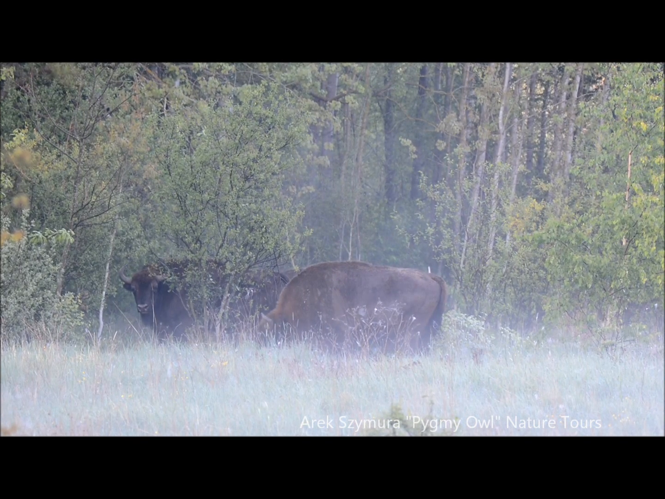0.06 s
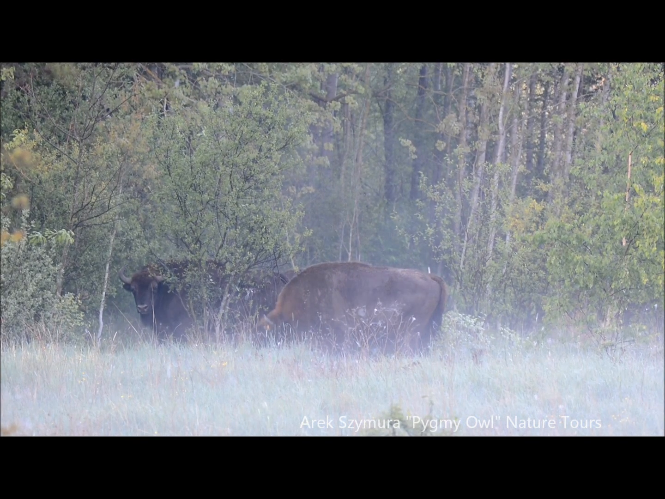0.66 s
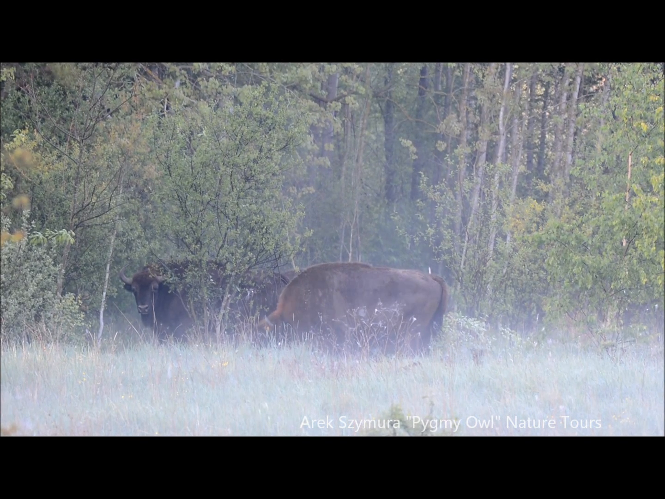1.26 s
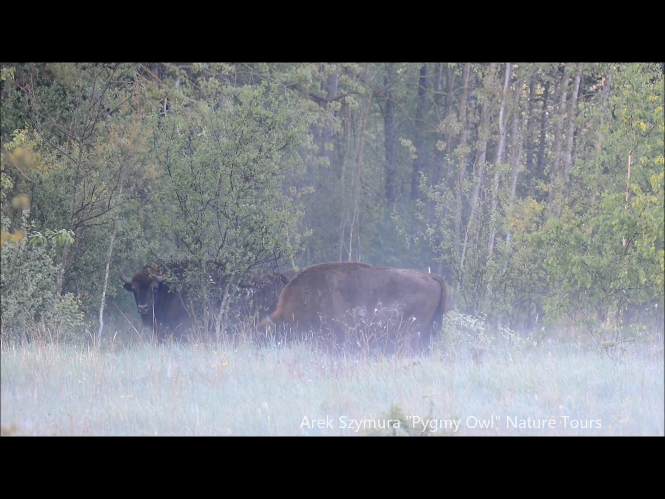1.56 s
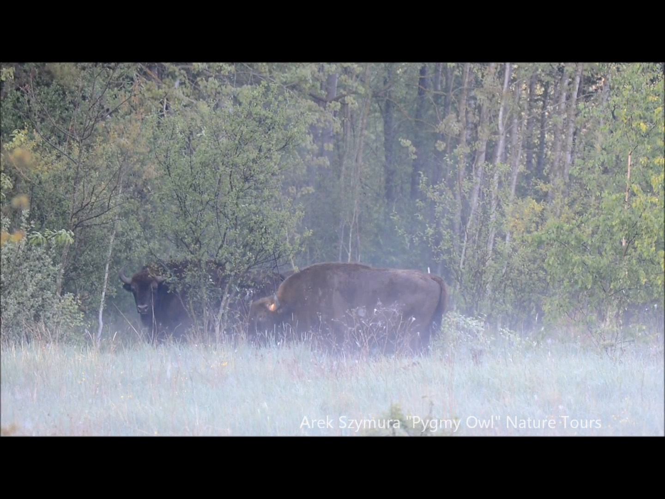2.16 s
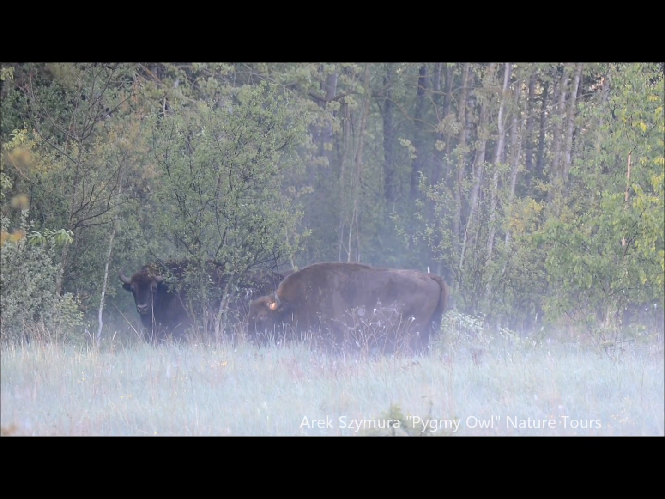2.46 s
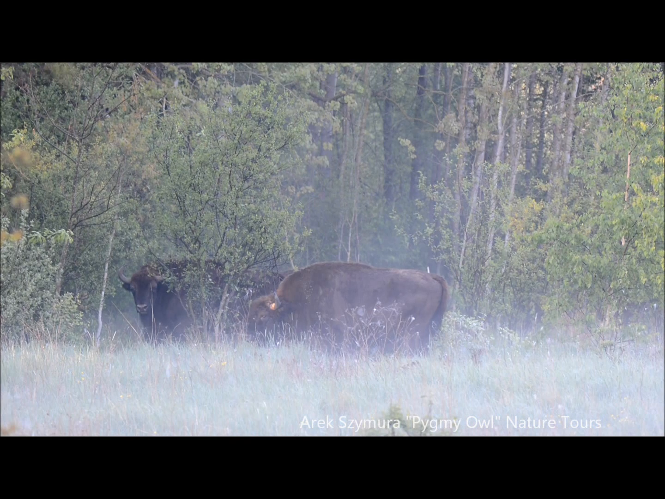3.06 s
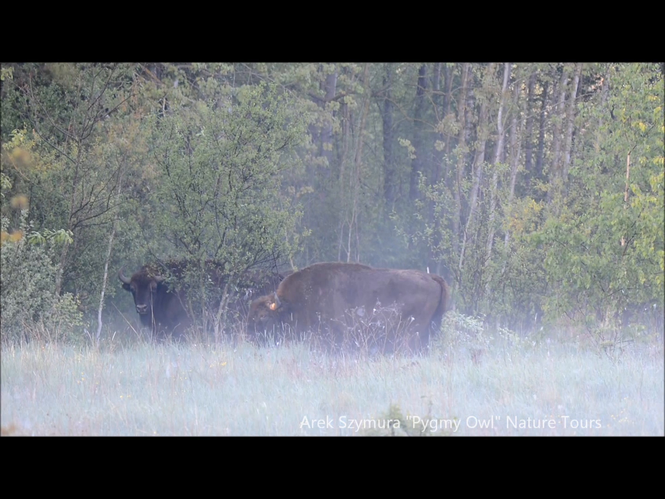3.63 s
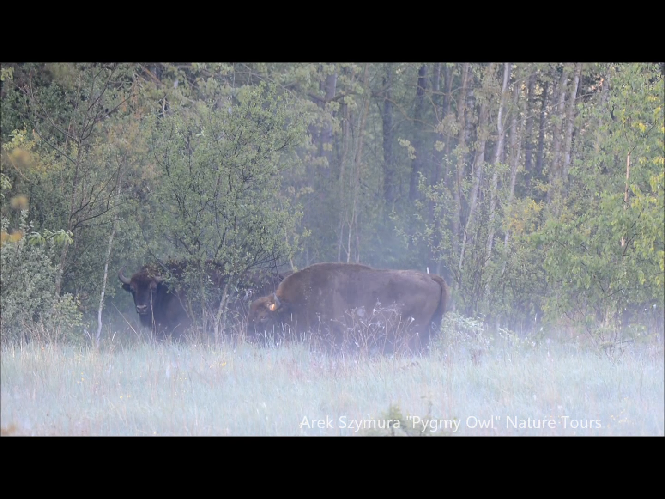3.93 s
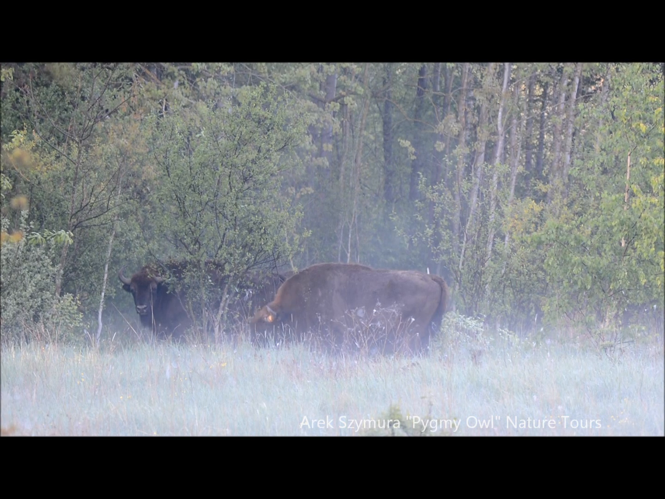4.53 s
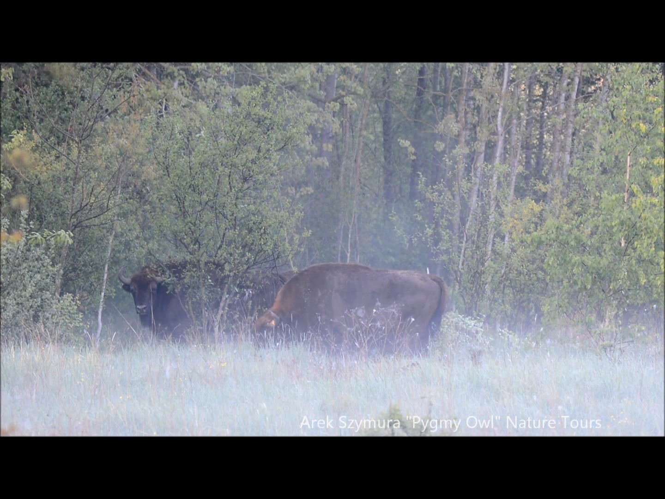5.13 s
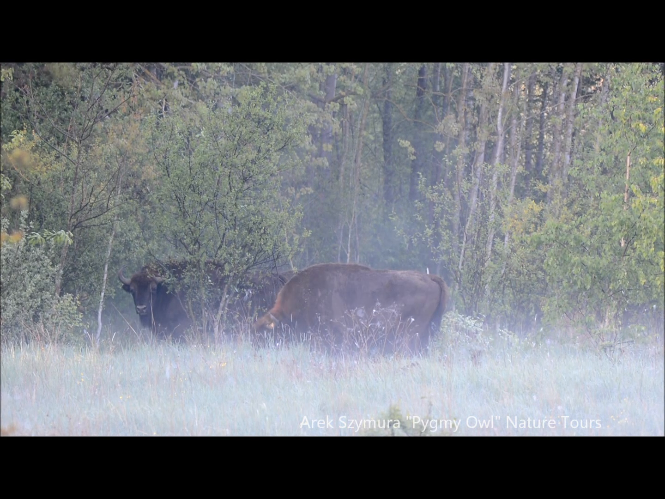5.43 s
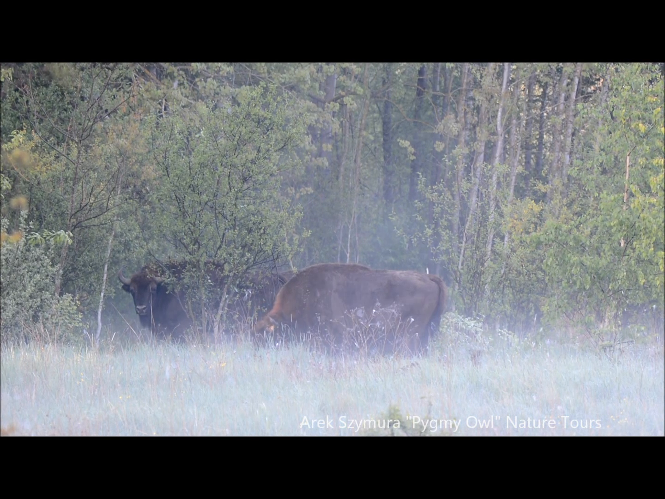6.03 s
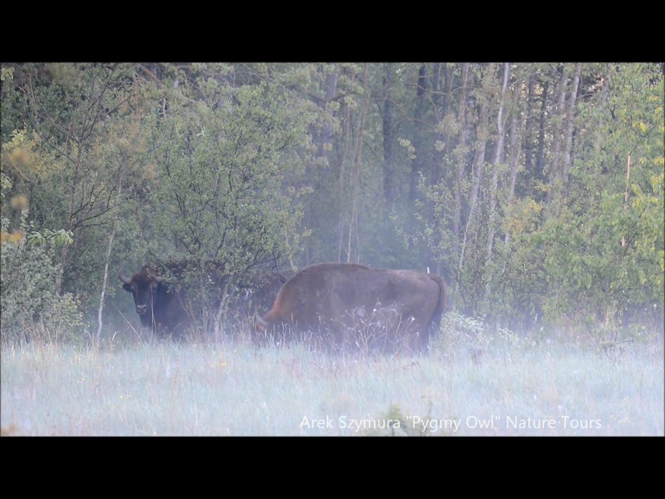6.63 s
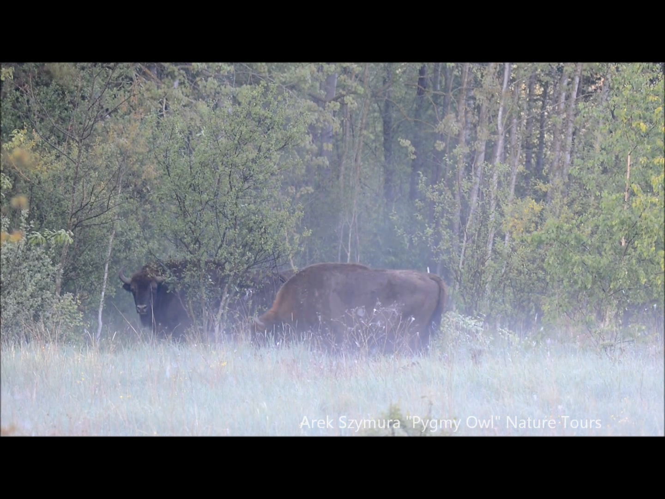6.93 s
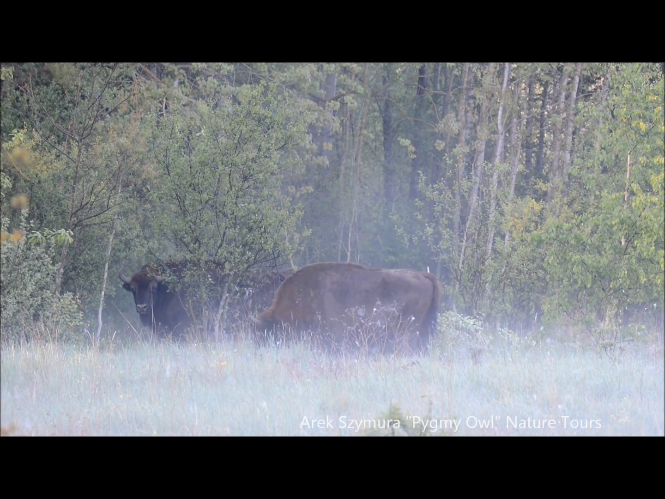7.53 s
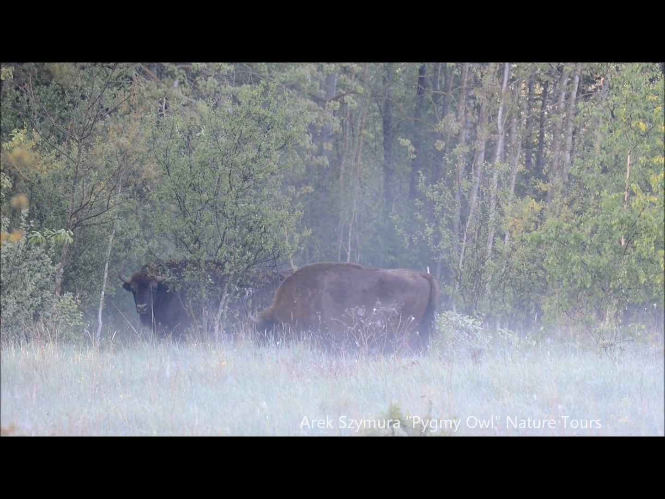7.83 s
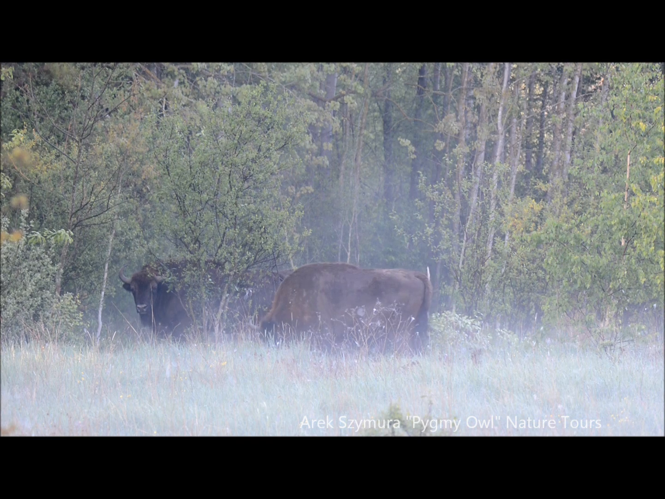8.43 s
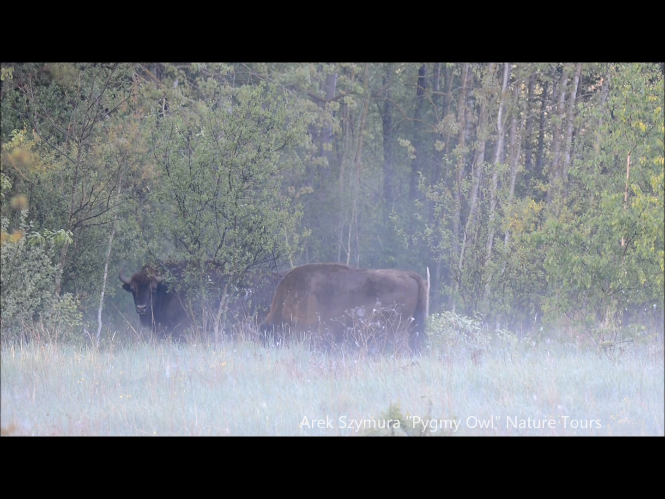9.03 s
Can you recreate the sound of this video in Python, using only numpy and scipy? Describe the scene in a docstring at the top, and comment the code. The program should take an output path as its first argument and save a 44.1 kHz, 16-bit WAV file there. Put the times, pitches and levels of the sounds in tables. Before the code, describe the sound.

A distant animal, probably a dog, barks and howls with a long echo, amid birdsong, soft bison grunts and steady hiss.

```python
"""Dawn on a meadow at a forest edge. Thrushes whistle deep in the wood, over still air and the hiss of a
nearly mono microphone. Some way off an animal, probably a dog, barks hoarsely and trails into a wavering
howl; the trees throw it back in a long echo. A warbler trills across two more barks, then a grazing
bison grunts softly now and then. In the lull come soft swells of hiss, probably the bison breathing out;
a tiny bird sings very high and faint chirps come and go, until four last barks close the scene."""
import sys
import numpy as np
from scipy import signal
from scipy.fft import rfft, irfft
from scipy.io import wavfile
from scipy.ndimage import uniform_filter1d

SR = 44100
rng = np.random.default_rng(int(sys.argv[2]) if len(sys.argv) > 2 else 0)


def to_wav(s):
    """Save 16-bit WAV."""
    ch = np.atleast_2d(s).T  # columns
    pcm = np.round(np.clip(ch, -1, 1) * 32767)  # PCM
    wavfile.write(sys.argv[1], SR, pcm.astype(np.int16))


N = 409248
TOP_HZ = 15750

# tone of the air bed: frequency_hz, level_db
AIR_SPECTRUM = [(18, -60), (30, -35), (81, -22.5), (120, -19.5), (277, -7.5), (359, -10.5), (399, -4),
                (591, -10), (673, -8.5), (1020, -8.5), (1230, -7.5), (1510, -8.5), (2490, -8.5),
                (3680, -12), (15500, -21)]
# stereo width of the air bed: frequency_hz, side_gain_db
AIR_WIDTH = [(60, -14), (110, 0), (200, -5), (380, -8.5), (700, -3), (1290, -4), (2380, -3.5), (4400, -1.5),
             (8120, -1), (15000, 1.5)]
# swells of the low rumble: centre_s, half_width_s, level_db
RUMBLE_SWELLS = [(0.5, 0.067, -69), (1.5, 0.1, -65.5), (2.86, 0.062, -69), (3.16, 0.16, -67),
                 (3.68, 0.084, -71.5), (5.1, 0.042, -71), (6.56, .06, -68), (8.52, 0.26, -71),
                 (9.1, 0.053, -66.5)]
# fader ride on the wash of far birds: time_s, level_db
CHORUS_RIDE = [(0.0, -56), (1.3, -54.5), (2.25, -55), (2.5, -59.5), (3.15, -53.5), (4.2, -62), (4.6, -78),
               (6.1, -73), (6.7, -58.5), (7.8, -68), (8.0, -63), (9.28, -56)]
# the clearest thrush whistles: start_s, length_s, from_hz, to_hz, level_db
THRUSH_WHISTLES = [(0.095, 0.093, 2410, 2220, -63), (0.38, 0.074, 3500, 2800, -68),
                   (0.62, 0.11, 2460, 2390, -63), (0.731, .11, 2890, 2930, -62.5),
                   (0.848, .043, 2910, 2550, -59), (1.032, .19, 2100, 2510, -61.5),
                   (1.16, 0.1, 2570, 3228, -63), (1.489, 0.13, 2050, 2402, -59.5),
                   (2.056, 0.18, 2155, 2470, -59), (2.162, 0.15, 2606, 3200, -58.5),
                   (2.308, 0.13, 3210, 3252, -62.5), (2.321, 0.036, 2460, 2295, -58),
                   (2.409, 0.048, 2400, 2250, -60), (3.152, .12, 3230, 3162, -62.5),
                   (3.173, 0.043, 2427, 2283, -59), (3.305, 0.056, 3550, 3154, -75),
                   (3.32, .076, 2754, 2720, -59), (3.483, 0.049, 3510, 3298, -74),
                   (3.719, 0.043, 2280, 2670, -64), (3.74, .049, 2010, 2040, -60),
                   (3.782, .048, 3360, 3200, -59.5), (3.84, 0.039, 2700, 2495, -64),
                   (4.018, .041, 3260, 3320, -61.5), (4.1, .044, 2980, 2515, -60),
                   (4.157, 0.062, 2520, 2270, -54), (4.167, 0.079, 1770, 1640, -57),
                   (4.246, 0.04, 2450, 2230, -56.5), (4.31, .065, 2120, 2070, -61),
                   (4.411, 0.069, 2095, 2003, -62.5), (5.072, 0.078, 2190, 2015, -64),
                   (6.231, 0.074, 3390, 3430, -66.5), (6.713, 0.069, 2670, 2080, -63),
                   (7.65, .14, 2560, 2006, -69.5), (7.92, .07, 2875, 3440, -57),
                   (8.591, .039, 3097, 2370, -61), (8.881, 0.063, 3064, 2690, -58),
                   (9.069, 0.13, 2215, 2528, -57.5)]
# fainter runs of thrush notes: start_s, end_s, pitch_hz, spread_octaves, level_db
THRUSH_PHRASES = [(3.1, 4.1, 2335, .22, -67), (4.503, 5.0, 3008, 0.27, -70),
                  (5.439, 5.66, 3280, 0.0152, -64)]
# the clearest chirps of small birds: start_s, length_s, from_hz, to_hz, level_db
BIRD_CHIRPS = [(0.238, .18, 3890, 3600, -65.5), (5.234, 0.071, 7020, 6200, -71),
               (6.31, 0.17, 3690, 4480, -71), (7.537, 0.083, 7700, 7800, -71),
               (7.923, .044, 4200, 3040, -61), (8.131, .08, 4700, 4580, -65.5),
               (8.41, 0.17, 3430, 3307, -65)]
# bands of the forest's reverb: centre_hz, t60_s, level_db
FOREST_REVERB = [(261, 2.3, -17), (449, 4, -12.5), (768, 3.1, -12), (1240, 2.9, -12.5), (2600, 1.2, -8.5),
                 (6150, 0.27, -5.5), (13100, .4, -8)]
# one row a bark: start_s, rise_s, fall_s, loud_half_width_s, mouth_lag_s, edge_pitch_hz, top_pitch_hz,
# fundamental_db, throat_db, mouth_db, roughness (0-1)
DOG_BARKS = [(0.48, 0.075, 0.14, 0.058, 0.0047, 391.7, 486.5, -33.5, -30, -31, 0.31),
             (0.68, 0.064, 0.093, 0.059, 0.033, 372.6, 440.1, -33.5, -33.5, -30.5, 0.19),
             (1.553, 0.0722, .12, .064, 0.002, 311.7, 340.8, -42.5, -38, -42, 0.6),
             (2.802, .075, 0.11, 0.054, .003, 384, 457.1, -33.5, -32.5, -34, 0.62),
             (8.403, .088, 0.13, 0.052, .001, 334.9, 486.5, -39, -31.5, -36, 0.74),
             (8.648, .082, .118, 0.052, 0.031, 290.3, 451, -33, -31, -35, 0.37),
             (8.85, 0.093, .108, 0.059, 0.0042, 278.2, 414, -37, -36, -35.5, 0.04),
             (9.215, 0.076, .1, 0.064, .004, 333, 431, -36, -37, -45, 0.7)]
# resonances of the dog's voice: centre_hz, width_hz, gain_db
DOG_THROAT = [(451, 87, 1.5), (673.6, 37, 11), (750, 92, 13), (966, 120, 3.5), (1254, 76, 25.5),
              (1470, 150, 12.5), (1765, 250, 9.5)]
# the howl that the second bark trails into: time_s, pitch_hz, level_db, mouth_db
DOG_HOWL = [(0.83, 380.9, -33, -50), (0.858, 377.3, -39.5, -39.5), (0.926, 393.7, -39, -33),
            (1.02, 372.7, -43, -43.5), (1.06, 345, -40.5, -56), (1.15, 378.8, -41.5, -43),
            (1.254, 350, -43, -59), (1.34, 381.7, -40.5, -46), (1.41, 352, -55.5, -47),
            (1.432, 359.4, -51, -58), (1.5, 341.7, -55, -56)]
# the howl clears, then cracks as the air runs out: time_s, roughness (0-1)
HOWL_ROUGHNESS = [(0.83, 0.61), (0.88, 0.14), (0.95, .04), (1.33, 0.09), (1.42, 0.7)]
# slaps off the banks of trees: delay_s, level_db
TREE_SLAPS = [(0.202, -27.5), (.48, -24.5), (.66, -27.5), (.82, -32.5)]
# the bison's grunts: time_s, level_db
BISON_GRUNTS = [(3.199, -48), (3.698, -44), (5.105, -42), (6.549, -39)]
# resonances of a grunt: centre_hz, width_hz, gain_db
BISON_MUZZLE = [(375, 73, 7), (736, 340, 2.5), (1056, 250, 3.5)]
# soft, breathy swells of hiss: start_s, length_s, level_db
BREATHY_HISSES = [(4.693, .22, -65.5), (5.18, 0.65, -61.5)]
# melody of the tiny bird: time_s, pitch_hz
TINY_BIRD_MELODY = [(5.2, 10600), (5.25, 11600), (5.31, 12200), (5.38, 11450), (5.46, 12200), (5.52, 13300),
                    (5.58, 12000), (5.715, 12400), (5.79, 12000)]


def undb(db):
    """Decibels to gain."""
    return 10 ** (np.asarray(db) / 20)


def times():
    """The time of every sample."""
    return np.arange(N) / SR


def curves(table):
    """One automation curve for each column after time_s."""
    time_s, *columns = np.transpose(table)
    return [np.interp(times(), time_s, column) for column in columns]


def unit(x):
    """Scale to rms 1."""
    return x / np.sqrt(np.mean(x ** 2) + 1e-20)


def wander(rate_hz):
    """Random drift that turns rate_hz times a second; rms 1."""
    points = rng.standard_normal(N // 8)
    return unit(np.interp(times() * rate_hz, np.arange(len(points)), points))


def bell(t, centre_s, half_s, steep=2):
    """A smooth swell from 0 to 1 and back."""
    return np.exp(-np.abs((t - centre_s) / half_s) ** steep)


def colour(x, points):
    """EQ through points of frequency_hz, gain_db on a log-frequency axis."""
    hz, db = np.transpose(points)
    bins_hz = np.fft.rfftfreq(N, 1 / SR)
    return irfft(rfft(x) * undb(np.interp(np.log(bins_hz + 1e-3), np.log(hz), db)), N)


def band(x, lo_hz, hi_hz, order=4):
    """Band-pass filter."""
    return signal.sosfilt(signal.butter(order, [lo_hz, hi_hz], "band", fs=SR, output="sos"), x + 1e-18)


def resonate(x, modes):
    """Ring parallel resonances: centre_hz, width_hz, gain_db."""
    return sum(undb(db) * signal.lfilter(*signal.iirpeak(hz, hz / width, fs=SR), x + 1e-18)
               for hz, width, db in modes)


def add(out, start_s, sound):
    """Mix a sound in at a time."""
    i = max(int(start_s * SR), 0)
    out[i:i + len(sound)] += sound[:max(N - i, 0)]


def stereo(mid, side):
    """Mid and side to left and right."""
    return np.array([mid + side, mid - side])


def glide(length_s, from_hz, to_hz, waver, arch=0):
    """One whistled note that swells, slides along an arch and fades; rms near 1."""
    progress = np.linspace(0, 1, int(length_s * SR))
    bends = np.interp(progress, np.linspace(0, 1, 12), rng.standard_normal(size=12))
    swell = np.sin(np.pi * progress)
    hz = (from_hz + (to_hz - from_hz) * progress) * (1 + waver * bends + arch * (swell - 2 / np.pi))
    return 2 * swell * np.sin(2 * np.pi * np.cumsum(hz) / SR)


def smear(t60_s, build_s):
    """The dense answer of nearby trunks to a click; energy 1."""
    t = np.arange(SR // 2) / SR
    answer = rng.standard_normal(len(t)) * undb(-60 * t / t60_s) * (1 - np.exp(-t / build_s))
    return answer / np.linalg.norm(answer)


def trunks(x, direct_db, scatter_db, t60_s):
    """Blend a sound with its smear among the trunks."""
    return undb(direct_db) * x + undb(scatter_db) * signal.fftconvolve(x, smear(t60_s, 0.0012))[:N]


def still_air(hiss_db=-59, rumble_db=-3, rumble_width=0.14, drone_db=-74):
    """The bed: even hiss, a restless low rumble and a faint far drone in the trees."""
    mid, side = (unit(colour(rng.standard_normal(N), AIR_SPECTRUM)) for _ in range(2))
    hiss = colour(stereo(mid, colour(side, AIR_WIDTH)), [(70, 1.5), (160, -5.5), (300, 0)])
    rumble_eq = [(15, -35), (40, -51), (90, -9.5), (190, -5), (300, -4), (600, -44), (3000, -80)]
    mid, side = unit(colour(rng.standard_normal((2, N)), rumble_eq))
    ride = undb(-81) + sum(undb(db) * bell(times(), s, half_s) for s, half_s, db in RUMBLE_SWELLS)
    rumble = ride * undb(rumble_db + 2 * wander(12)) * stereo(mid, rumble_width * side)
    drone = undb(drone_db + 2.5 * wander(5)) * unit(band(rng.standard_normal(N), 381, 500, order=2))
    return undb(hiss_db) * hiss + rumble + drone


def far_chorus(trim_db=-6, count=450):
    """A wash of whistles from birds too far off to tell apart."""
    out = np.zeros(N)
    for when, length, pitch, slide, loudness in rng.random((count, 5)):
        hz = 2000 * 1.8 ** pitch
        note = glide(.04 + .07 * length, hz, hz * (.75 + .5 * slide), waver=.07)
        add(out, when * N / SR, undb(6 * loudness - 7 * pitch) * note)
    return unit(out) * undb(curves(CHORUS_RIDE)[0] + trim_db)


def thrushes(note_gap_s=.088, note_s=0.0602):
    """Fluty, arched slides, singly and in quick runs."""
    out = np.zeros(N)
    notes = list(THRUSH_WHISTLES)
    for start_s, end_s, centre_hz, spread, db in THRUSH_PHRASES:
        onsets = np.arange(start_s, end_s, note_gap_s)
        for onset_s, (pitch, slide) in zip(onsets, rng.uniform(-1, 1, size=(16, 2))):
            hz = centre_hz * 2 ** (spread * pitch)
            notes.append((onset_s, note_s, hz, hz * 2 ** (spread * slide / 2), db))
    for start_s, length_s, from_hz, to_hz, db in notes:
        # short notes and falling notes curl over the top
        arch = .08 * (length_s < .065) + .5 * max(np.log(from_hz / to_hz), 0)
        note = glide(length_s + 0.017, from_hz, to_hz, waver=0.0132, arch=arch)
        add(out, start_s - .01, undb(db) * note)
    return out


def small_birds():
    """Chirps above the thrushes, made buzzy by a fast pitch waver."""
    out = np.zeros(N)
    for start_s, length_s, from_hz, to_hz, db in BIRD_CHIRPS:
        add(out, start_s, undb(db) * glide(length_s, from_hz, to_hz, waver=0.0647))
    return out


def forest(x, width=0.062, build_s=0.016):
    """The wood answers with a long, narrow reverb; the lows outlast the highs."""
    t = np.arange(3 * SR) / SR
    centres = np.array([row[0] for row in FOREST_REVERB])
    edges = [150, *np.sqrt(centres[1:] * centres[:-1]), TOP_HZ]
    tails = np.zeros((2, len(t)))
    for (_, t60_s, db), lo_hz, hi_hz in zip(FOREST_REVERB, edges, edges[1:]):
        fade = undb(-60 * t / t60_s) * (1 - np.exp(-t / build_s))
        tails += undb(db) * band(rng.standard_normal(tails.shape), lo_hz, hi_hz) * fade / np.linalg.norm(fade)
    mid, side = (signal.fftconvolve(x, tail)[:N] for tail in tails)
    return stereo(mid, width * side)


def dog_controls(sink_db=(15, 11.5, 12.5), edge_rough=0.31, attack_s=0.033, release_s=0.065):
    """Pitch, three band levels, roughness and gate. A bark is loudest and clearest atop its pitch arch."""
    t = times()
    hz, howl_db, mouth_db = curves(DOG_HOWL)
    controls = np.array([hz, howl_db - 1.5, howl_db - 3, mouth_db - 2, curves(HOWL_ROUGHNESS)[0]])
    gate = 1. * ((t >= DOG_HOWL[0][0]) & (t < DOG_HOWL[-1][0]))
    for start_s, rise_s, fall_s, half_s, lag_s, edge_hz, top_hz, *peaks_db, rough in DOG_BARKS:
        now = (t >= start_s) & (t < start_s + rise_s + fall_s)
        age_s = t[now] - start_s
        arch = np.sin(np.interp(age_s, [0, rise_s, rise_s + fall_s], [0, np.pi / 2, np.pi])) ** 1.05
        pitch_hz = edge_hz + (top_hz - edge_hz) * arch
        # the mouth opens late: the fundamental peaks first, then the throat and mouth bands
        slack = [1 - bell(age_s, rise_s + late_s, half_s, 1.96) for late_s in (0, 0.92 * lag_s, lag_s)]
        levels_db = [peak - sink * amount for peak, sink, amount in zip(peaks_db, sink_db, slack)]
        controls[:, now] = [pitch_hz, *levels_db, rough + edge_rough * slack[0]]
        gate[now] = 1
    # the voice builds after each silence and dies away when it stops
    attack = np.roll(uniform_filter1d(gate, int(attack_s * SR)), int(attack_s * SR / 2))
    release = uniform_filter1d(gate, int(release_s * SR))
    return *uniform_filter1d(controls, size=640), np.minimum(attack, release)


def dog(jitter=0.0347, doubling=0.29, rasp_db=-31):
    """Barks and howl: vocal folds ring the throat. When hoarse, cycles go uneven and air rasps through."""
    hz, low_db, throat_db, mouth_db, rough, gate = dog_controls()
    rough = np.clip(rough, 0, 1)
    phase = 2 * np.pi * np.cumsum(hz * (1 + (0.0036 + jitter * rough) * wander(260))) / SR
    folds = sum(np.cos(k * phase) for k in range(1, 7))
    # every other cycle weakens, which puts a growl between the harmonics
    growl = sum(np.cos((k + .5) * phase + wander(60)) for k in range(1, 5))
    # the folds close softly, so only the first three harmonics are strong
    tone = colour(folds + rough * doubling * growl, [(1350, 0), (1650, -11), (2200, -22)])
    breath = unit(band(rng.standard_normal(N), 450, 3270, order=2)) * (1 + 1.5 * np.cos(phase))
    voice = resonate(tone + 2 * rough * breath, DOG_THROAT)
    rasp_eq = [(1500, -21), (2200, -90), (3500, 61), (5500, 47), (9000, 6), (15000, -40)]
    out = undb(mouth_db + rasp_db) * rough * unit(colour(rng.standard_normal(N), rasp_eq))
    # the jaw shifts the weight between the fundamental, the throat and the mouth
    for lo_hz, hi_hz, db in ((301, 572, low_db), (572, 1020, throat_db), (1000, 1964, mouth_db)):
        part = band(voice, lo_hz, hi_hz, order=5)
        running_rms = np.sqrt(uniform_filter1d(part ** 2, SR // 30) + 1e-12)
        out += undb(db) * part / running_rms
    return out * gate


def tree_slaps(x):
    """Separate, dull echoes off the banks of trees."""
    out = np.zeros(N)
    dull = band(x, 430, 850, order=2)
    for delay_s, db in TREE_SLAPS:
        add(out, delay_s, undb(db) * dull)
    return out


def warbler(start_s=1.45, gap_s=.06023, slowing_s=.000076, count=29, steady_count=14, width=0.35):
    """A trill that slows a little; each note is a downward sweep, a quick flick and a pip."""
    steady_hz, round_hz = 6180, (6630, 5880, 7860)  # the pips hold one pitch, then go round three
    out = np.zeros((2, N))
    for k, chance in enumerate(rng.standard_normal(count)):
        age_s = k * (gap_s + slowing_s * (k - 1) / 2)
        # louder quickly at first, then steadily
        db = -43.5 + 3.1 * age_s - 6.5 * np.exp(-age_s / 0.12) + .7 * chance
        steady = k < steady_count
        pip_hz = steady_hz if steady else round_hz[(k - steady_count) % len(round_hz)]
        trim_db = -5 * (pip_hz > 7500)
        sweep = glide(.022, 7300, 3950, waver=.02, arch=-.06)
        flick = glide(0.0116, min(1.27 * pip_hz, 8800), .9 * pip_hz, waver=0.017)
        pip = glide(0.0163, 1.02 * pip_hz, .98 * pip_hz, waver=0.012)
        note = np.zeros(SR // 10)
        add(note, 0, undb(-9) * sweep)
        add(note, .016, undb(-14 + trim_db - 10 * steady) * flick)
        add(note, .025, undb(-12 + trim_db) * pip)
        # the bird turns its head, so every note scatters differently
        mid, side = (signal.fftconvolve(note, smear(0.11, 0.007)[:SR // 8]) for _ in range(2))
        add(mid, 0, undb(-7.5) * note)  # the direct sound
        for ear, sound in zip(out, stereo(mid, width * side)):
            add(ear, start_s + age_s - .008, undb(db) * sound)
    return out


def bison(rate_hz=105, length_s=0.062, trim_db=-7, breath=0.155):
    """Each grunt is a few slow, breathy beats of a big larynx ringing the muzzle."""
    cycles = np.cumsum(rate_hz * (1 + 0.14 * wander(90))) / SR
    beats = np.diff(np.floor(cycles), prepend=0)
    muzzle = resonate(beats + breath * rng.standard_normal(N), BISON_MUZZLE)
    swell = sum(undb(db) * bell(times(), time_s + .012, length_s / 3) for time_s, db in BISON_GRUNTS)
    return undb(trim_db) * swell * unit(band(muzzle, 140, 1100, order=3))


def breathy_hisses():
    """Soft swells of hiss with a light flutter, probably the bison breathing out."""
    t = times()
    gate = sum(undb(db) * ((t > s) & (t < s + length_s)) for s, length_s, db in BREATHY_HISSES)
    hiss_eq = [(150, -10.5), (350, 2), (1300, 3), (2200, 6), (4000, -8), (12000, -39)]
    hiss = unit(colour(rng.standard_normal(N), hiss_eq))
    return uniform_filter1d(gate, SR // 20) * hiss * undb(2.2 * wander(30))


def tiny_bird(level_db=-59, fade_s=0.098, flutter_db=5.5):
    """A thin, wavering whistle near the top of hearing."""
    t = times()
    hz, = curves(TINY_BIRD_MELODY)
    start_s, end_s = TINY_BIRD_MELODY[0][0], TINY_BIRD_MELODY[-1][0]
    fade = np.clip(np.minimum(t - start_s, end_s - t) / fade_s, 0, 1)
    gain = fade * undb(level_db + flutter_db * wander(30))
    return gain * np.sin(2 * np.pi * np.cumsum(hz * (1 + 0.01 * wander(90))) / SR)


def twitter(from_s=5.2, to_s=8.2, low_hz=6000, high_hz=8800, length_s=.09, level_db=-75, count=7):
    """Faint, high chirps sprinkled through the lull between the barks."""
    out = np.zeros(N)
    for when, pitch, slide in rng.random((count, 3)):
        hz = low_hz + pitch * (high_hz - low_hz)
        chirp = glide(length_s, hz, hz * (.9 + .2 * slide), waver=.05)
        add(out, from_s + when * (to_s - from_s), chirp)
    return undb(level_db) * out


def scene(call_width=0.076):
    """The mix: all callers sit dead centre; the deeper in the trees, the more smeared."""
    calls = dog() + trunks(bison(), direct_db=-1.5, scatter_db=-11, t60_s=1.0)
    animals = trunks(calls, direct_db=0, scatter_db=-13, t60_s=.3)
    side = call_width * signal.fftconvolve(calls, smear(0.04, 0.0011))[:N]
    trill = warbler()
    birds = trunks(thrushes() + small_birds() + twitter(), direct_db=-.6, scatter_db=-6, t60_s=.3)
    birds += trunks(far_chorus(), direct_db=-4, scatter_db=0, t60_s=.5)
    birds += trunks(tiny_bird(), direct_db=-5, scatter_db=-11, t60_s=0.34)
    mid = animals + birds + breathy_hisses()
    echoes = tree_slaps(animals) + forest(mid + trill.mean(axis=0))
    return stereo(mid, side) + trill + echoes + still_air()


def record(dry):
    """A steep low-pass takes off the very top."""
    return signal.sosfilt(signal.ellip(10, .2, 70, TOP_HZ, fs=SR, output="sos"), dry)


dry = scene()
out = record(dry)
to_wav(out)
```